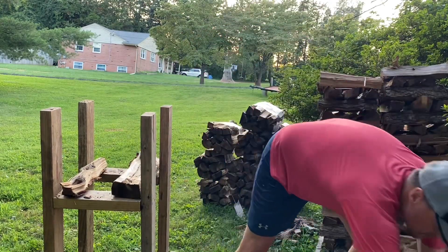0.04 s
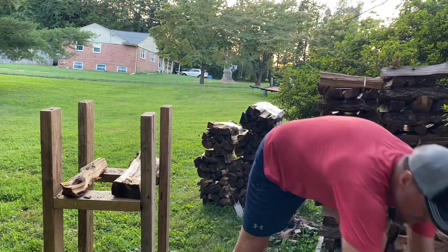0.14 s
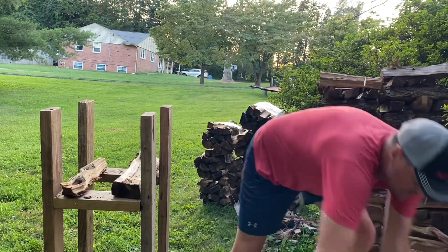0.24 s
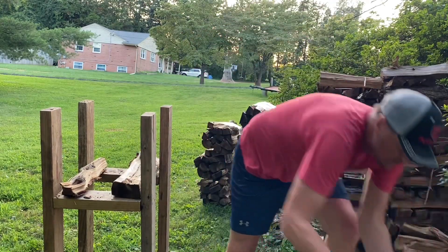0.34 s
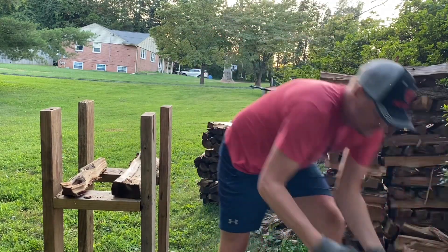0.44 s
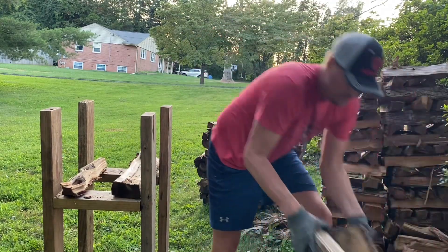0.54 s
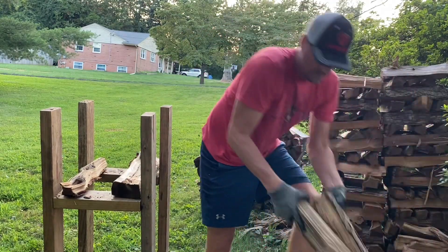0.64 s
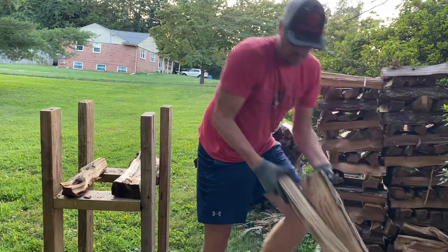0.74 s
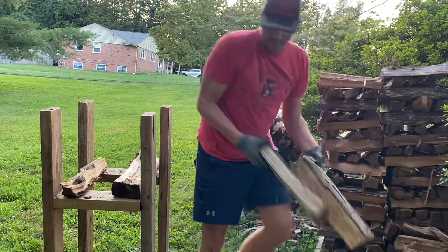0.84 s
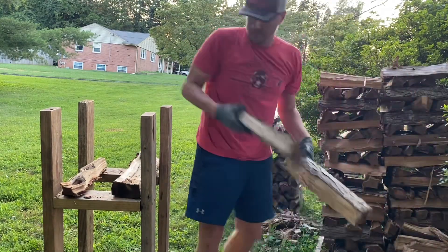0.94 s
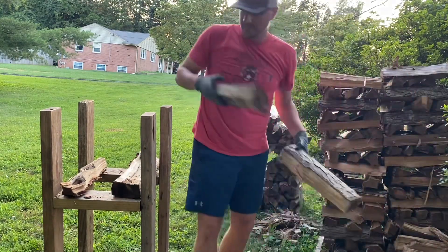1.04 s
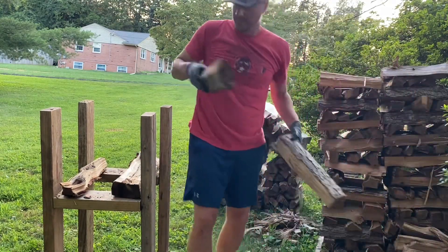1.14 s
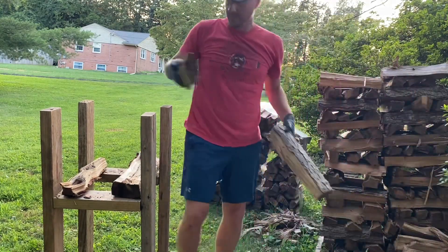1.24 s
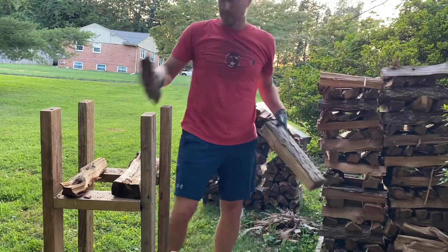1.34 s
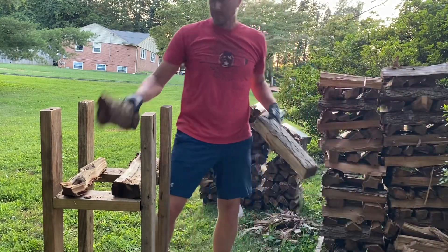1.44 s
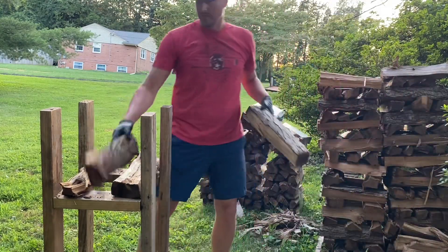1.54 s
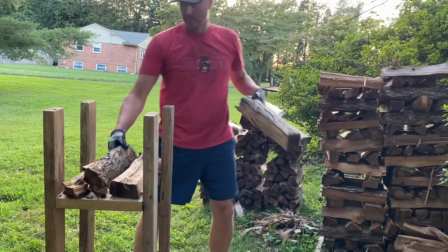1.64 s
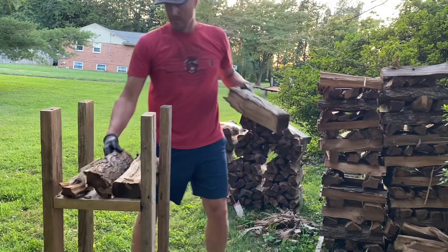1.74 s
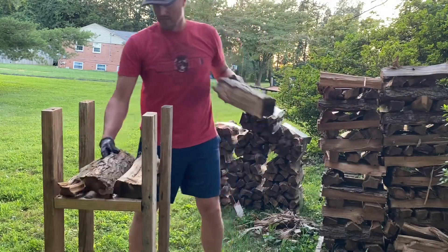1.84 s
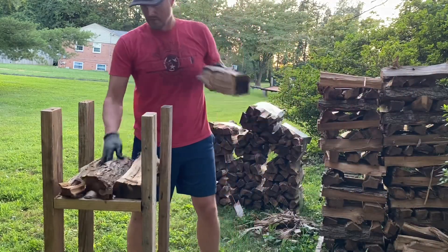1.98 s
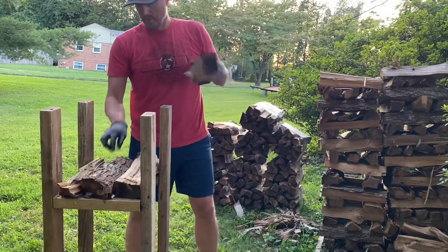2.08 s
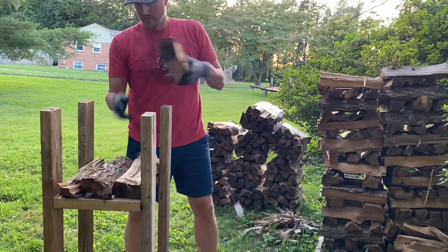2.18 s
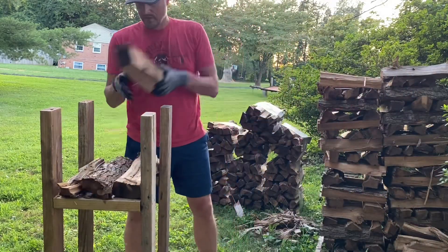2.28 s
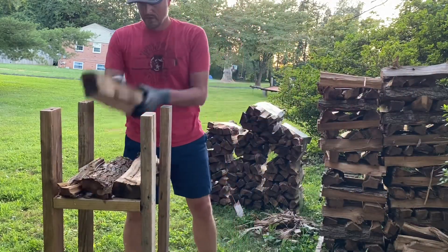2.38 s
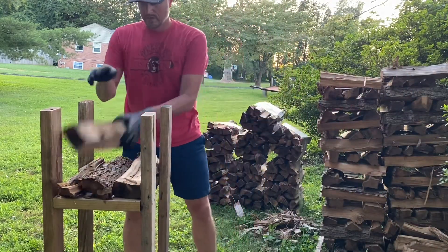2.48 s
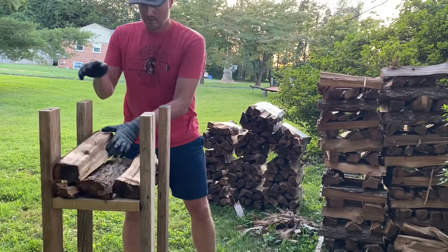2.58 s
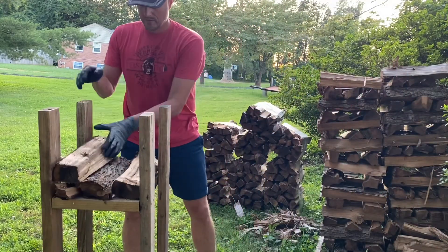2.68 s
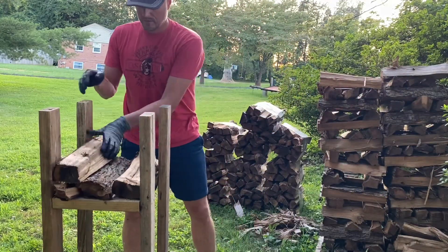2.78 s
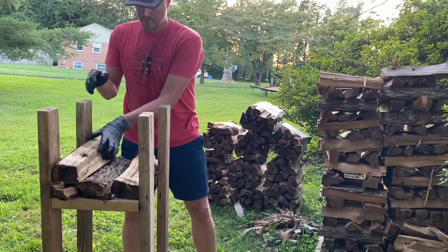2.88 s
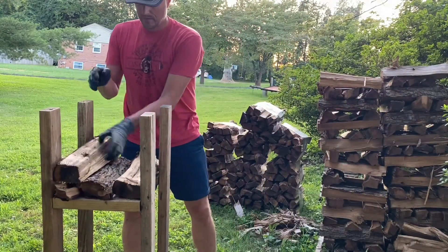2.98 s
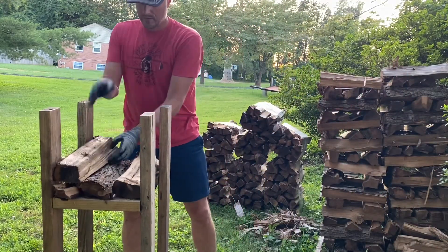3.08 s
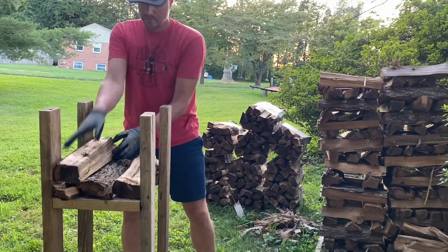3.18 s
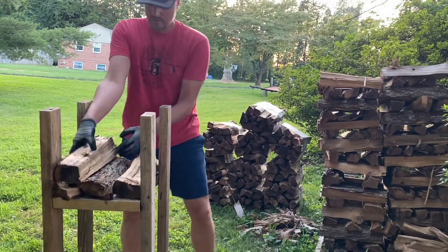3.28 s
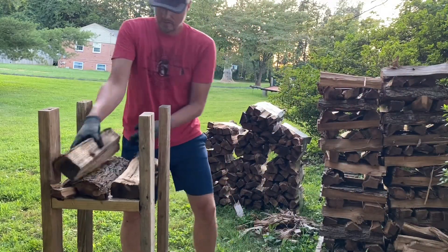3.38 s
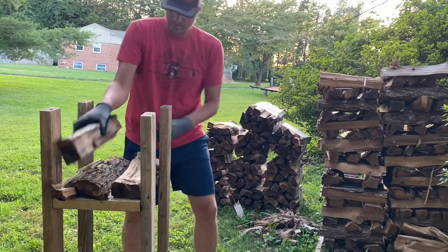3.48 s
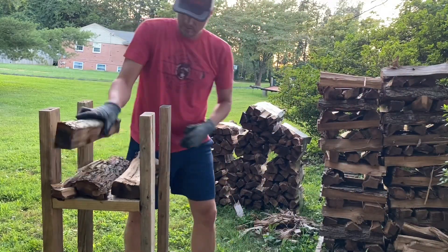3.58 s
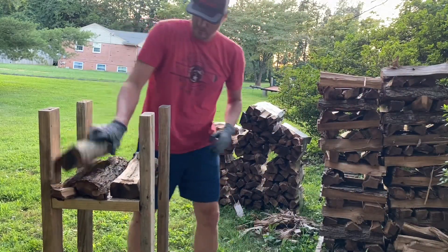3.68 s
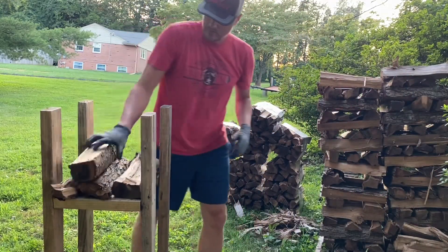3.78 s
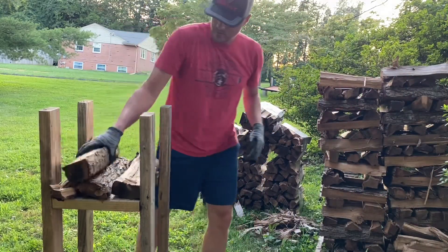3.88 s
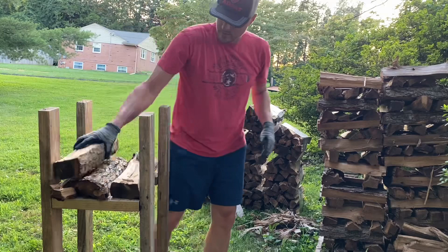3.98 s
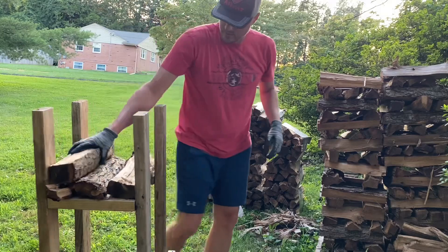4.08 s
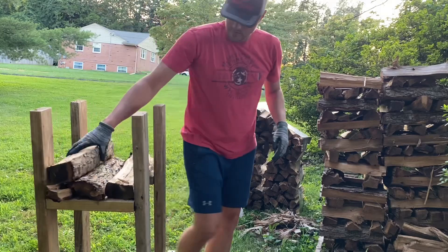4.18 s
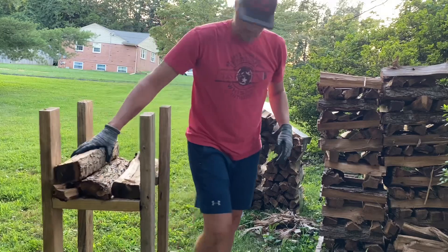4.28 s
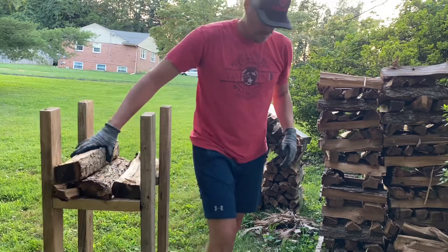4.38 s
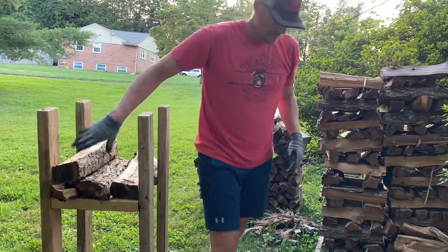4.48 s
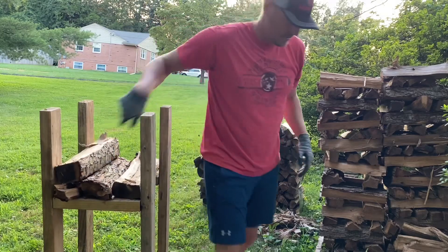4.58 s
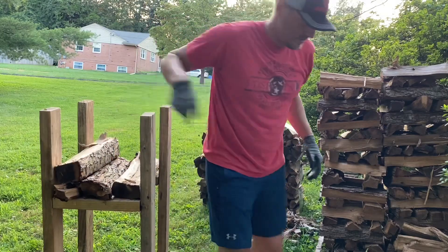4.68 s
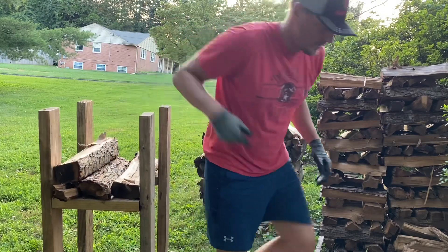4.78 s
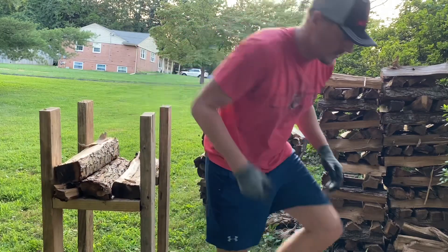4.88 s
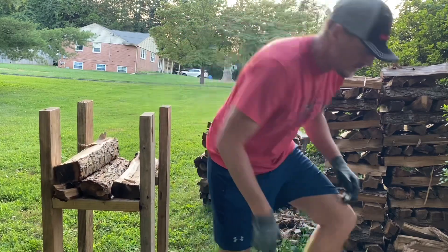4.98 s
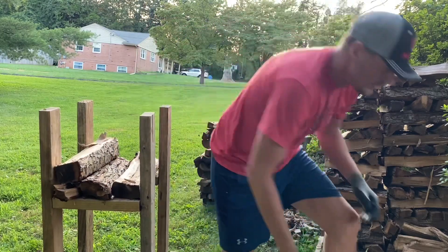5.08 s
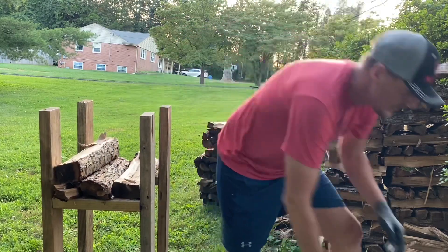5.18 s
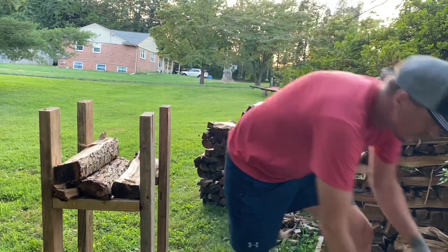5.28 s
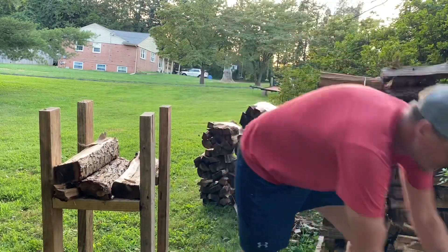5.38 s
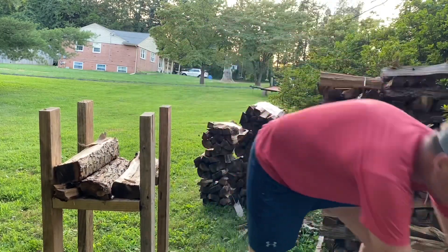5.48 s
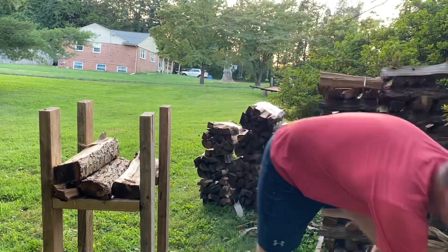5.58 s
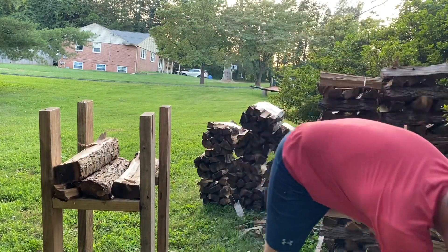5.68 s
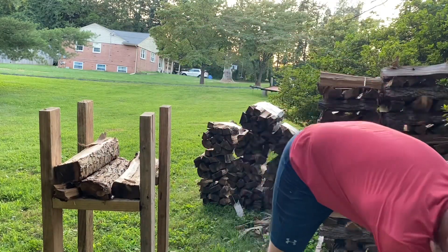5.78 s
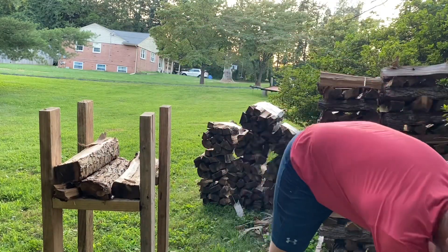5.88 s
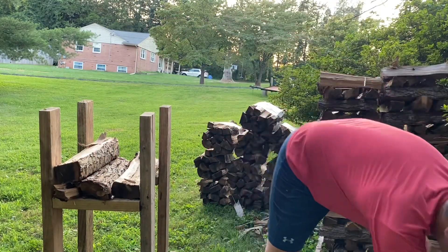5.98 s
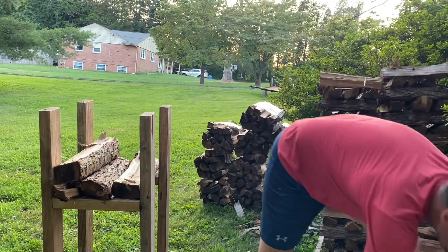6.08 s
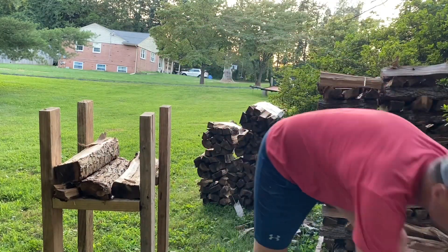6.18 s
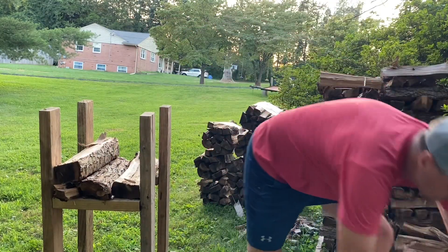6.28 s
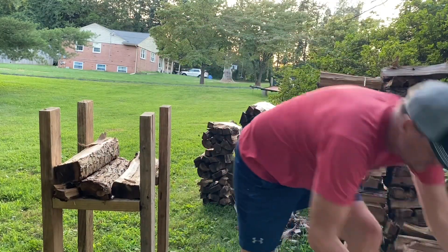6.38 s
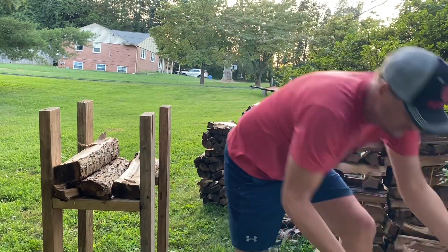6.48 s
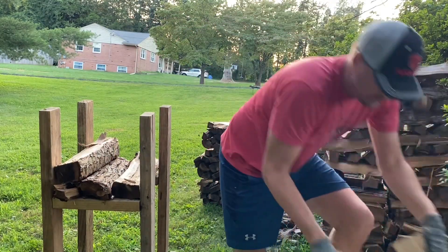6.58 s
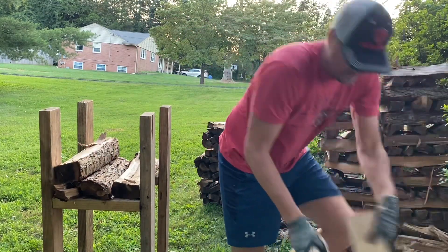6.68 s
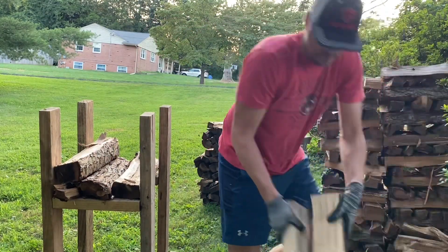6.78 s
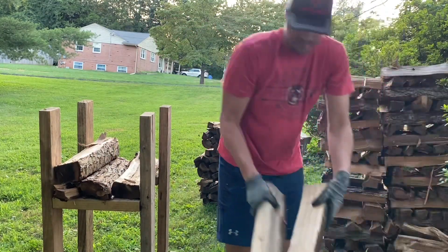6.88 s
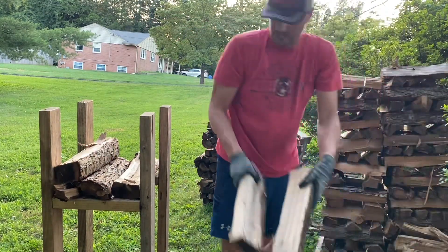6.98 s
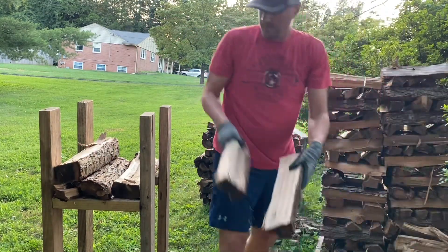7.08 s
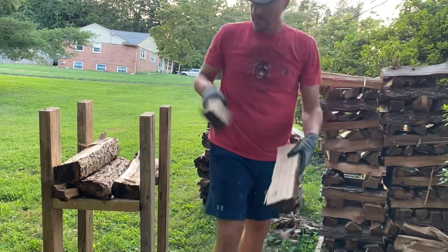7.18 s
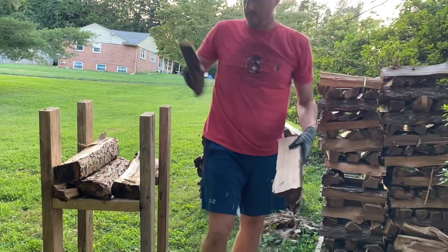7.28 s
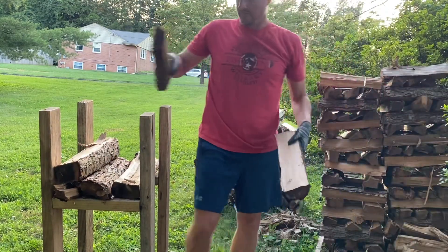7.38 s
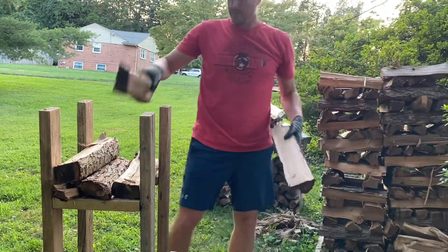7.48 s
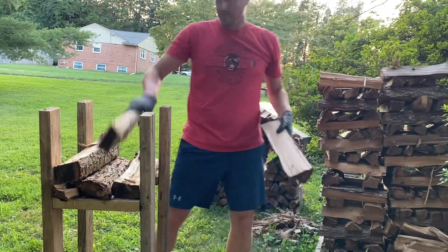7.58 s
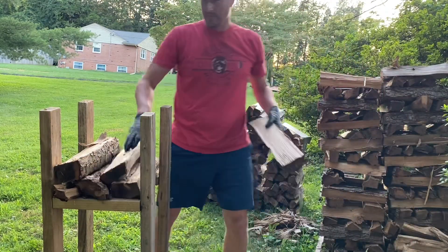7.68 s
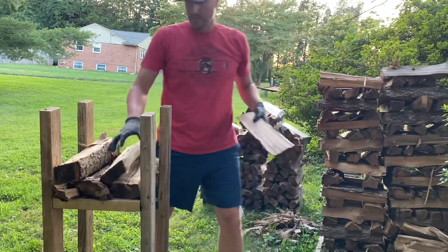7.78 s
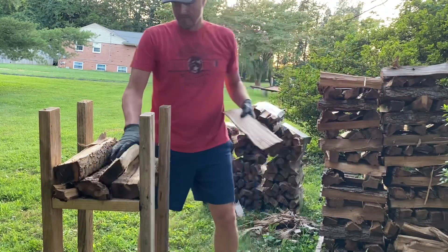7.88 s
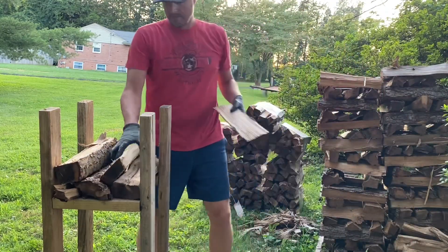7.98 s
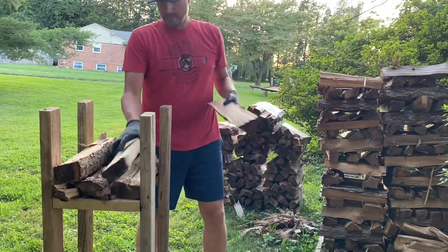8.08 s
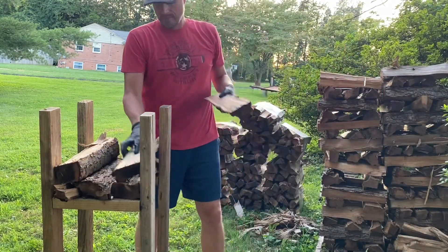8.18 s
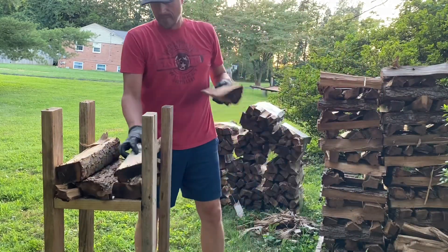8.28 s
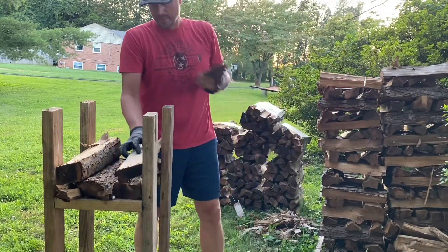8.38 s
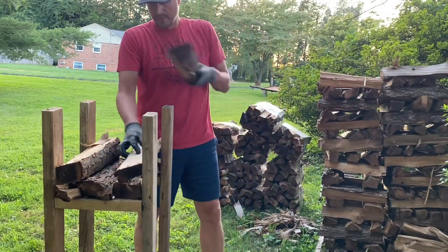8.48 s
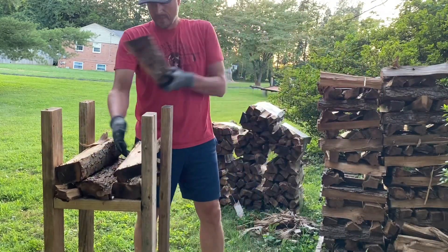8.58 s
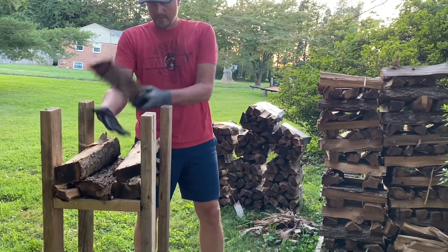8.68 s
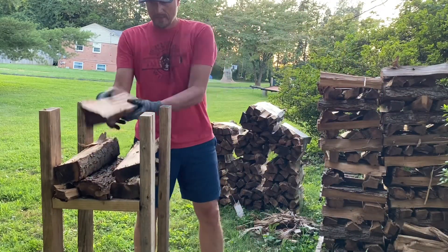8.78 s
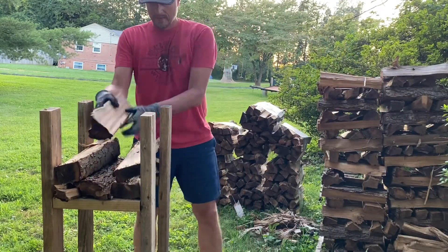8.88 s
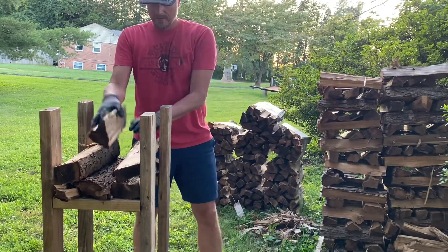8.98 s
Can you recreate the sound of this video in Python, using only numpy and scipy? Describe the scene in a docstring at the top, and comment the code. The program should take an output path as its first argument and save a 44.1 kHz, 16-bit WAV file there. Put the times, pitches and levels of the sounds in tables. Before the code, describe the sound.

Someone stacks split firewood outdoors a few metres from a stereo microphone. Bark rubs and crackles, soft-ground thumps lead to a sharp dry clack, and logs knock onto a wooden frame one by one. A lull follows, then the loudest tumbling thumps, a hard hand-held clack, light taps, a solid knock on the rack and a softer one. Steady insects and far traffic lie beneath, with almost no echo.

```python
"""A lawn with a heap of split firewood and a wooden rack, a few metres from a stereo microphone.
Logs are picked off the heap and laid on the rack: they thump on the ground, clack together in the hands
and knock on the rack, each blow a set of decaying wood modes with bursts of shaped noise.
Bark snaps, scrapes and rustles as grains of noise that come in uneven slips.
Further off are a rumble and traffic hum of slow noise, insects in narrow noise bands and a bird of falling tones."""
import sys
import numpy as np
from scipy import signal
from scipy.fft import rfft, irfft, next_fast_len
from scipy.io import wavfile
from scipy.ndimage import uniform_filter1d, map_coordinates

SR = 44100
rng = np.random.default_rng(int(sys.argv[2]) if len(sys.argv) > 2 else 0)


def materialize(psi):
    """Save the field psi as 16-bit PCM at rate SR to the path in sys.argv[1].

    A 1-D psi becomes a single channel; in a 2-D psi each row is a channel.
    """
    bounded = np.clip(np.atleast_2d(psi).T, -1, 1)
    quanta = np.round(bounded * 32767).astype(np.int16)
    wavfile.write(sys.argv[1], SR, quanta)


N = 398663
AGE = np.arange(SR // 3) / SR  # seconds since a contact

# The far surroundings. Each row: time in seconds, rumble and traffic in dB, both before a fixed lift.
FAR_LEVELS = [(0, -44, -51), (1.3, -46, -50.5), (4.6, -44.5, -53.5), (7.4, -42, -49), (9.04, -42.5, -46.5)]
# Colour of the outdoor rumble and of the distant traffic. Each row: frequency in Hz, relative dB per Hz.
RUMBLE_COLOUR = [(13, -54), (22, -30), (48, -3), (97, -3), (125, -1.5), (167, -7.5), (232, -5.5),
                 (290, -18), (374, -15.5), (404, -29), (520, -16.5), (680, -38), (1140, -120)]
TRAFFIC_COLOUR = [(220, -35), (380, -7), (502, -12.5), (744, 0), (1620, -10.5), (1790, -17), (1990, -16.5),
                  (2600, -24.5), (4500, -30), (5850, -62), (9900, -120)]
# How alike the far sounds are at the two microphones. Each row: frequency in Hz, correlation from -1 to 1.
FAR_ALIKE = [(60, 0.99), (120, 0.93), (240, 0.93), (480, -0.61), (950, -0.51), (1890, -0.27), (3770, 0.6),
             (7520, -0.25), (15000, 0.3)]
# Colour of the insect chorus in the trees. Each row: frequency in Hz, relative dB per Hz.
CHORUS_COLOUR = [(3000, -20), (4500, -8), (5400, 0.5), (5850, 6.5), (6300, -1.5), (7200, -17), (10000, -22),
                 (16000, -21.5)]
# One nearer insect buzzes in evenly spaced phrases: the start of one phrase, spacing and length in seconds.
# A phrase is already under way at the opening.
BUZZ_START_S, BUZZ_EVERY_S, BUZZ_S = .22, .444, .32

# Gloves, bark and grass. Each row: time in seconds, rubbing and crackle in dB, both before a fixed lift.
RUSTLE_LEVELS = [(0.0, -45.5, -55), (0.25, -63.5, -66), (0.8, -55.5, -61), (1.43, -66, -80),
                 (1.86, -59.5, -60.5), (2.09, -82, -70), (3.93, -53.5, -62.5), (4.23, -66, -72),
                 (4.93, -80.5, -90), (5.29, -59.5, -91), (5.66, -62.5, -66), (6.19, -44.5, -54.5),
                 (6.65, -59, -65), (6.9, -50.5, -55), (7.4, -65, -70.5), (7.93, -56.5, -59.5),
                 (8.48, -70, -73), (9.04, -67, -70)]
# Colour of rubbing bark and of crisp, thin edges. Each row: frequency in Hz, relative dB per Hz.
BARK_COLOUR = [(400, -11), (900, 2), (2400, -3), (4500, -1), (8000, -8), (16000, -22)]
EDGE_COLOUR = [(2500, -35), (6000, 6), (10000, 1), (16000, -2.5)]
# The hands go to and fro. Each row: time in seconds, place from 0 at the heap to 1 at the rack.
WALK = [(.8, 0), (1.5, 0.72), (4.5, 0.79), (5.2, 0.23), (6.9, 0.06), (7.6, 0.5)]

# Logs shift and drop on the heap. Each row: start in seconds, strength in dB.
THUMPS = [(0.029, -28.5), (0.062, -26.5), (0.198, -16), (5.147, -32.5), (5.89, -21.5), (5.933, -19.5),
          (6.118, -8.5), (6.196, -10), (6.22, -7), (6.288, -12.5), (6.305, -11.5), (6.354, -20),
          (6.46, -25.5)]
# Ringing of the heap. Each row: frequency in Hz, relative level in dB, t60 in seconds before damping.
HEAP_MODES = [(131.4, -0.5, 0.13), (185, 5, 0.11), (246, -1.5, 0.13), (314, -8, 0.13), (439, -11, 0.12),
              (563, -13, 0.079)]
ROCK_S, ROCK_DB = .029, -12.5  # each log rocks back once: delay, level against the drop
KNOCK_DB, KNOCK_GROWS = -11, 1.83  # the woody knock in a 0 dB drop; dB per dB of the drop
SLIP_LEAD_S, SLIP_S, SLIP_HZ = .04, 0.1, 1170  # a log slides off its neighbour: head start, length, centre
SLIP_DB, SLIP_GROWS = -34.5, 0.22  # that slide in a 0 dB drop; dB per dB of the drop

# A log is dragged or nudged into place. Each row: start in seconds, level in dB, centre in Hz.
SCRAPES = [(0.056, -44, 900), (0.411, -41, 1390), (0.5674, -45, 4510), (1.727, -41.5, 1020),
           (1.8987, -44.5, 1030), (1.972, -41, 1550), (2.675, -36.5, 3900), (2.946, -39, 3670),
           (3.215, -48, 1740), (3.33, -41, 1910), (3.501, -35, 695), (5.142, -35, 1180), (5.165, -35, 2500),
           (6.056, -34.5, 1300), (6.856, -33.5, 1040)]
SCRAPE_S = .041  # length of one nudge

# Light glancing taps of log on log. Each row: start in seconds, strength in dB, lowest mode in Hz.
TAPS = [(0.438, -41.5, 1072), (0.795, -33.5, 1128), (3.512, -36.5, 574), (5.4902, -36.5, 1413),
        (6.644, -42.5, 994), (6.671, -36.5, 940), (6.825, -30.5, 962), (6.988, -31.5, 1130),
        (6.995, -23.5, 1096), (7.003, -23.5, 1078)]
# Ringing of a tapped log, shifted to the pitch of each tap.
# Each row: frequency in Hz, relative level in dB, t60 in seconds before damping.
TAPPED_LOG_MODES = [(1082, 9.5, 0.072), (2076, 2.5, 0.045), (2576, 4, 0.048), (3130, -37, 0.026),
                    (3133, -4.5, 0.12), (4470, -14, 0.034), (5120, 1, 0.02), (7130, -9, 0.029)]
# Colour of the crack of a glancing tap. Each row: frequency in Hz, relative dB per Hz.
GLANCE_COLOUR = [(2000, -37), (3200, 3.5), (5300, 4.5), (7000, 3.5), (10000, -5.5), (16000, -13)]
GLANCE_DB, GLANCE_GROWS = 23, 1.94  # harder taps are brighter: crack of a 0 dB tap; dB per dB of the tap

# The clearest splinters snap. Each row: start in seconds, edge level in dB, body level in dB.
SNAPS = [(0.5481, -32, -21.5), (0.984, -53, -41), (1.899, -43.5, -38), (2.625, -45, -54),
         (2.8749, -40, -59), (2.9138, -40.5, -45.5), (2.948, -41.5, -36.5), (3.032, -63, -43),
         (3.782, -38, -35.5), (5.1772, -45, -39), (5.774, -44.5, -52), (6.107, -47, -23.5),
         (6.1912, -51, -29.5), (6.2144, -42, -26.5), (6.2906, -35, -21), (7.3592, -47, -48),
         (8.018, -40.5, -35), (8.7325, -46, -50)]
# Colour of breaking splinters. Each row: frequency in Hz, relative dB per Hz.
SPLINTER_COLOUR = [(300, -18), (1000, -6), (2400, 5.5), (4500, 1.5), (7000, -11), (12000, -19)]

# Two hand-held logs meet.
# Each row: start in seconds, ring in dB, thud in dB, crack in dB, share of the second log from 0 to 1.
CLACKS = [(0.6136, -32.5, -44, -40, 0.5), (0.6285, -9.5, -23.5, -28, 1), (0.683, -49, -51, -46.5, 0.6),
          (6.7063, -10, -11, -15.5, 0.12)]
# Ringing of the two held logs. Each row: frequency in Hz, relative level in dB, t60 in seconds.
HAND_LOG_MODES = [(654, -5.5, 0.071), (920, -2.5, 0.074), (1130, 1.5, 0.082), (1620, -18, 0.07),
                  (1733, -17, 0.021), (2104, -11, 0.09), (3214, -22, 0.05), (3450, -17, 0.05),
                  (3920, -19, 0.045), (4180, -24, 0.045)]
SECOND_LOG_MODES = [(725, 10, 0.0097), (809, -8, 0.076), (900, -8, 0.054), (1054, -5, 0.1),
                    (1150, 1.5, 0.049), (1260, -17, 0.098), (1930, -22, 0.029), (3050, -23, .044)]
# Colour of their dense, short-lived modes. Each row: frequency in Hz, relative dB per Hz.
HAND_GRAIN = [(210, -41), (350, 3), (467, -4.5), (1100, 1), (1470, -11), (1580, -3.5), (2020, -7.5),
              (2250, -11.5), (4500, -45), (5850, -41), (9900, -120)]

# A log lands on the rack.
# Each row: start in seconds, strength in dB, log centre in Hz, frame centre in Hz, rise in seconds.
LAID = [(1.542, -33.5, 935, 199, 0.0036), (1.5594, -18.5, 990, 233, .002), (2.003, -37.5, 580, 370, 0.032),
        (2.521, -17.5, 634, 400, 0.019), (2.596, -32.5, 620, 404, 0.0026), (2.738, -52, 420, 400, .005),
        (3.596, -44.5, 550, 323, 0.0052), (3.697, -24.5, 654, 347, 0.0052), (3.705, -15, 1110, 310, 0.0029),
        (3.97, -30.5, 930, 322, 0.0022), (3.986, -27, 836, 320, 0.0065), (4.029, -30, 845, 290, 0.0064),
        (7.645, -22, 1140, 260, 0.011), (7.665, -10, 1700, 340, .0027), (8.185, -28.5, 820, 235, 0.021)]
# Ringing of the rack frame and of a log on it.
# Each row: frequency in Hz, relative level in dB, t60 in seconds before damping.
FRAME_MODES = [(103, -3.5, 0.15), (193.7, -8.5, 0.13), (321.7, -6.5, 0.057), (380.3, -4, 0.088),
               (448, -6.5, 0.028)]
RACK_LOG_MODES = [(610, -1, .065), (745, -2, .055), (920, -4, .045), (1020, -1, .05), (1200, -4, .045),
                  (1455, -3, .045), (1650, -1, .045), (1870, -2, .045), (2100, -5, .035)]
# Colour of the dense log modes, of a dull thud and of cracking bark.
# Each row: frequency in Hz, relative dB per Hz.
RACK_GRAIN = [(250, -67), (420, 7), (600, 0), (1000, 0), (1400, -7.5), (2000, -10), (2500, -14),
              (3500, -47), (5000, -46)]
DULL_COLOUR = [(30, -37), (60, -40), (100, 5), (200, -4.5), (400, -8.5), (600, -21.5), (1200, -45)]
CRACK_COLOUR = [(1000, -13), (2500, 3), (4000, -0.5), (6500, -5), (10000, -9), (16000, -15)]
BOOM_EVEN_HZ, BOOM_DB_PER_OCTAVE = 840, -7  # a duller contact passes more of the blow into the frame
CRACK_DB, CRACK_GROWS = -16.5, 0.82  # bark cracking under a 0 dB blow; dB per dB of the blow

# A small bird. Each row: start in seconds, level in dB.
CHIRPS = [(4.689, -72), (4.811, -66.5), (4.925, -63)]

# Decay of the echo off the yard. Each row: frequency in Hz, t60 in seconds.
YARD_DECAY = [(150, 0.3), (1000, 0.24), (4000, 0.26), (12000, 0.13)]
# Treble response of the microphone. Each row: frequency in Hz, gain in dB.
MIC_RESPONSE = [(6500, -1), (7500, -1), (8400, -9), (9500, 4.5), (10500, 6), (12200, 4.5), (13400, -23),
                (14200, -1.5), (15200, 9.5), (16000, -5)]
TOP_HZ = 16200  # nothing passes above this


def amp(db):
    """Decibels to gain."""
    return 10 ** (np.asarray(db) / 20)


def unit(x):
    """Scale to rms 1."""
    return x / np.sqrt(np.mean(x ** 2) + 1e-20)


def blow(x):
    """Scale a short sound to the energy of 20 ms at rms 1."""
    return unit(x) * np.sqrt(SR / 50 / x.shape[-1])


def along(points, hz):
    """Read a curve of (Hz, value) points on a log frequency axis."""
    f, v = np.transpose(points)
    return np.interp(np.log(hz + 1), np.log(f + 1), v)


def curves(rows):
    """One value per sample for each column after the time."""
    s, *cols = np.transpose(rows)
    return [np.interp(np.arange(N) / SR, s, c) for c in cols]


def wobble(rate):
    """A smooth random curve with rate knots a second."""
    knots = rng.standard_normal(int(N * rate / SR) + 4)
    return map_coordinates(knots, [np.arange(N) * rate / SR])


def filtered(x, response):
    """Shape the spectrum of x by a response of frequency."""
    n = x.shape[-1]
    m = next_fast_len(n + 4096)  # spare room for the tail
    return irfft(rfft(x, m) * response(np.fft.rfftfreq(m, 1 / SR)), m)[..., :n]


def noise(spectrum, alike, size):
    """Coloured stereo noise of rms 1; the mix of mid and side sets the left-right likeness."""
    def response(hz):
        turn = np.arccos(np.clip(along(alike, hz), -1, 1)) / 2
        return amp(along(spectrum, hz)) * [np.cos(turn), np.sin(turn)]

    mid, side = filtered(rng.standard_normal((2, size)), response)
    return unit(np.array([mid + side, mid - side]))


def fade(t60, rise):
    """A contact builds up, then dies away."""
    return amp(-60 * AGE / t60) * (1 - np.exp(-AGE / max(rise, 1e-5)))


def burst(spectrum, t60, rise):
    """A dying crowd of modes too dense to tell apart, made of fading noise."""
    crowd = noise(spectrum, [(300, 0.94), (1200, 1.0), (5000, 0.4)], size=len(AGE))
    return blow(crowd * fade(t60, rise))


def ring(modes, pitch, rise, damping):
    """Wood rings in decaying modes, with new strengths and phases wherever it is struck."""
    total = 0
    for hz, db, t60 in modes:
        strength, phase = rng.standard_normal(2)
        tone = np.sin(2 * np.pi * hz * pitch * AGE + np.pi * phase)
        total = total + amp(db + 2 * strength) * tone * fade(t60 / damping, rise)
    return blow(total)


def centred(x, hz, octaves):
    """The hardness of a contact favours a broad band around hz."""
    return blow(filtered(x, lambda f: 1 / (1 + (np.log2((f + 1) / hz) / octaves) ** 2)))


def slips(rate, spread_db, life, size):
    """Rough surfaces catch in tiny slips of very uneven size: an envelope of rms 1."""
    happens = rng.random(size) < rate / SR
    sizes = happens * amp(spread_db * np.minimum(rng.exponential(size=size), 4))
    return unit(np.abs(signal.fftconvolve(sizes, fade(life, 0.0006))[:size]))


def add(track, s, sound):
    """Mix a short sound in at time s."""
    start = max(round(s * SR), 0)
    track[:, start:start + len(AGE)] += sound[..., :N - start]


def placed(x, left_lead_ms, left_db):
    """A source's bearing sets how much sooner and louder it reaches the left microphone."""
    side = np.array([[.5], [-.5]])
    return amp(side * left_db) * filtered(x, lambda hz: np.exp(2j * np.pi * hz * side * left_lead_ms / 1000))


def carried(x):
    """Handling sounds travel with the hands between the bearings of the heap and of the rack."""
    place = np.clip(curves(WALK)[0], 0, 1)
    at_heap = placed(x, left_lead_ms=-0.081, left_db=0.5)
    at_rack = placed(x, left_lead_ms=0.19, left_db=3.3)
    return (1 - place) * at_heap + place * at_rack


def surroundings():
    """A low outdoor rumble and the hum of distant traffic: two noises of slowly changing level."""
    rumble_db, traffic_db = curves(FAR_LEVELS)
    rumble_gain = amp(rumble_db + 2.5 + 2.07 * wobble(7))
    traffic_gain = amp(traffic_db + 3.0 + 0.17 * wobble(5.3))
    rumble = rumble_gain * noise(RUMBLE_COLOUR, FAR_ALIKE, size=N)
    return rumble + traffic_gain * noise(TRAFFIC_COLOUR, FAR_ALIKE, size=N)


def insects():
    """A nearly steady far chorus, and one nearer insect whose narrow buzz comes in phrases."""
    t = np.arange(N) / SR
    chorus = amp(-56.0) * amp(wobble(1.563)) * noise(CHORUS_COLOUR, [(6000, 0.13)], size=N)
    in_phrase = (t - BUZZ_START_S) % BUZZ_EVERY_S < BUZZ_S
    singing = uniform_filter1d(1. * in_phrase, size=2000)  # softens the edges of the phrases
    band = [(4800, -50), (5100, -9), (5190, -1), (5290, -9), (5600, -50)]  # Hz, relative dB
    buzz = noise(band, [(5000, 0.23)], size=N)
    return chorus + amp(-61.5 + 2 * wobble(25)) * singing * buzz


def rustle():
    """Clothes, bark and trodden grass rustle: noise gated by small slips in uneven strokes."""
    rub_db, crackle_db = curves(RUSTLE_LEVELS)
    strokes = wobble(13)
    rubbing = .4 + slips(rate=250, spread_db=3, life=.02, size=N)
    crackling = .2 + slips(rate=130, spread_db=5, life=.014, size=N)
    rub = amp(rub_db + 7.0 + 2.1 * strokes) * rubbing * noise(BARK_COLOUR, [(1000, 0.93)], size=N)
    crackle = amp(crackle_db + 7.0 + 2 * strokes) * crackling * noise(EDGE_COLOUR, [(8000, 0.092)], size=N)
    return rub + crackle


def slide(centre_hz, length):
    """A short slide is a run of slips that swells and stops, coloured by the wood."""
    stroke = np.sqrt(np.abs(np.sin(np.pi * np.minimum(AGE / max(length, .005), 1))))
    catching = .25 + slips(rate=450, spread_db=3.5, life=.009, size=len(AGE))
    grains = catching * noise(BARK_COLOUR, [(1000, .7)], size=len(AGE))
    return centred(stroke * grains, centre_hz, octaves=1.0)


def heap():
    """A log slides, thumps on the soft ground, rocks back and sets its neighbours rumbling."""
    out = np.zeros((2, N))
    for start, drop_db in THUMPS:
        add(out, start - SLIP_LEAD_S, amp(SLIP_DB + SLIP_GROWS * drop_db) * slide(SLIP_HZ, SLIP_S))
        for s, db in [(start, drop_db), (start + ROCK_S, drop_db + ROCK_DB)]:
            thump = ring(HEAP_MODES, 1, .002, damping=1.6)
            neighbours = ring(HEAP_MODES, 1.07, .008, damping=.8)
            thump = thump + amp(-8) * neighbours + amp(-8) * burst(DULL_COLOUR, .04, .002)
            size = 1 + 0.051 * rng.standard_normal()  # a different log is struck each time
            knock = amp(5.0) * burst(RACK_GRAIN, 0.087, 0.0024)
            knock = knock + amp(-3) * ring(RACK_LOG_MODES, size, 0.0034, damping=1.0)
            add(out, s, amp(db) * thump + amp(KNOCK_DB + KNOCK_GROWS * db) * knock)
    return placed(out, left_lead_ms=-0.17, left_db=-1.6)


def scrapes():
    """Wood slides briefly over bark as a log is pulled free or nudged into place."""
    out = np.zeros((2, N))
    for s, db, centre_hz in SCRAPES:
        add(out, s, amp(db) * slide(centre_hz, SCRAPE_S))
    return out


def taps():
    """Short glancing contacts wake the higher modes of a log; each tap has its own pitch."""
    out = np.zeros((2, N))
    for s, db, hz in TAPS:
        pitch = hz / TAPPED_LOG_MODES[0][0]
        log = amp(-2) * ring(TAPPED_LOG_MODES, pitch, .0004, damping=1.2)
        log = log + amp(-4) * burst(SPLINTER_COLOUR, .02, .0003)
        crack = burst(GLANCE_COLOUR, 0.06, 0.00026)
        add(out, s, amp(db) * log + amp(GLANCE_DB + GLANCE_GROWS * db) * crack)
    return placed(out, left_lead_ms=-0.026, left_db=-0.3)


def snap(edge_db, body_db):
    """A splinter breaks in a click, and bark dust trails after it."""
    body = burst(SPLINTER_COLOUR, 0.02, 0.00011) + amp(-6.5) * burst(SPLINTER_COLOUR, 0.13, 0.003)
    edge = burst(EDGE_COLOUR, 0.0072, .0002) + amp(-2) * burst(EDGE_COLOUR, 0.16, 0.00077)
    edge_hz = 9400 * 2 ** ((edge_db - body_db) / 22)  # thin splinters have little body and click higher
    return amp(body_db) * body + amp(edge_db) * centred(edge, edge_hz, octaves=0.79)


def snaps():
    """Splinters break as the logs are handled."""
    out = np.zeros((2, N))
    for s, edge_db, body_db in SNAPS:
        add(out, s, snap(edge_db, body_db))
    return out


def clacks():
    """Dry logs hit each other while held, and both can ring."""
    out = np.zeros((2, N))
    for s, ring_db, thud_db, crack_db, share in CLACKS:
        share = np.clip(share, 0, 1)
        first = ring(HAND_LOG_MODES, 1, .0008, damping=1)
        second = ring(SECOND_LOG_MODES, 1, .0008, damping=1)
        logs = np.sqrt(1 - share) * first + np.sqrt(share) * second
        logs = logs + amp(-2) * burst(HAND_GRAIN, .032, .0008)
        thud = burst(DULL_COLOUR, 0.017, 0.002)
        crack = burst(CRACK_COLOUR, 0.02, 0.00035) + amp(-6) * burst(CRACK_COLOUR, 0.085, 0.0043)
        add(out, s, amp(thud_db) * thud + amp(ring_db) * logs + amp(crack_db) * crack)
    return placed(out, left_lead_ms=-0.015, left_db=-2.0)


def rack():
    """A log lands on the others: it rings, its bark cracks, and the frame booms under it."""
    out = np.zeros((2, N))
    for s, db, log_hz, frame_hz, rise in LAID:
        frame_db = db + BOOM_DB_PER_OCTAVE * np.log2(log_hz / BOOM_EVEN_HZ)
        crack_db = CRACK_DB + CRACK_GROWS * db
        frame = ring(FRAME_MODES, 1, rise, damping=1.17) + amp(-3.5) * burst(DULL_COLOUR, 0.11, rise)
        frame = centred(frame, frame_hz, octaves=0.71)
        size = 1 + 0.01 * rng.standard_normal()  # no two logs are quite alike
        log = ring(RACK_LOG_MODES, size, rise, damping=1) + burst(RACK_GRAIN, .042, rise)
        log = centred(log, log_hz, octaves=1.43)
        crack = burst(CRACK_COLOUR, 0.02, rise / 2) + amp(-3.5) * burst(CRACK_COLOUR, 0.13, rise)
        crack = blow(crack * (1.2 + slips(rate=2800, spread_db=-4.0, life=0.0054, size=len(AGE))))
        add(out, s, amp(frame_db) * frame + amp(db) * log + amp(crack_db) * crack)
    return placed(out, left_lead_ms=0.15, left_db=2.5)


def bird():
    """Thin chirps from a small bird: tones that fall in pitch under a smooth swell."""
    out = np.zeros((2, N))
    hz = 3200 + 1300 * np.exp(-AGE / .027)
    tone = np.sin(2 * np.pi * np.cumsum(hz) / SR)
    swell = np.exp(-((AGE - .02) / 0.017) ** 2)
    for s, db in CHIRPS:
        add(out, s, amp(db) * blow(tone * swell))
    return out


def yard(x):
    """Woodpiles and trees scatter a short tail: noise that decays at its own pace in each band."""
    hz, t, z = signal.stft(rng.standard_normal((2, SR // 2)), SR, nperseg=256)
    decay = amp(-60 * t / along(YARD_DECAY, hz)[:, None])
    tail = signal.istft(z * decay, SR, nperseg=256)[1]
    return signal.fftconvolve(x, tail / np.linalg.norm(tail[0]), axes=1)[:, :N]


def scene():
    """The wood with its echo off the yard, and the surroundings further away."""
    wood = rack() + clacks() + taps() + heap() + carried(snaps() + scrapes())
    wood = filtered(wood, lambda hz: (1j * hz / (45 + 1j * hz)) ** 2)  # logs are too small to radiate deep bass
    return wood + amp(-19) * yard(wood) + carried(rustle()) + surroundings() + insects() + bird()


def record(dry):
    """The microphone ports shape the treble with peaks and notches; the hardest blows overload the input."""
    x = filtered(dry, lambda hz: amp(along(MIC_RESPONSE, hz)))
    x = x / (1 + np.abs(x) ** 6) ** (1 / 6)  # soft limit near full scale
    return filtered(x, lambda hz: hz < TOP_HZ)


dry = scene()
out = record(dry)
materialize(out)
```